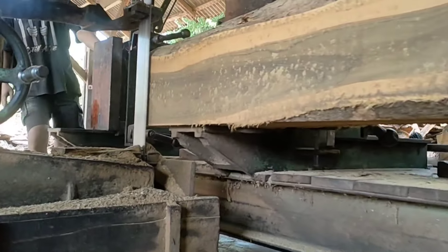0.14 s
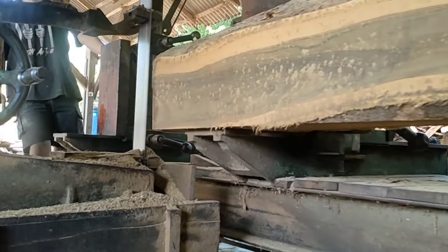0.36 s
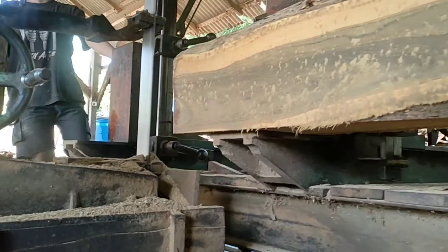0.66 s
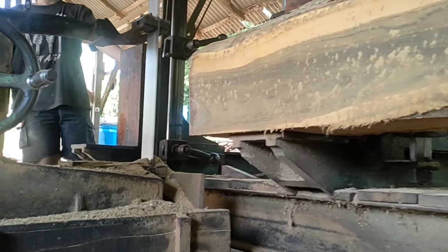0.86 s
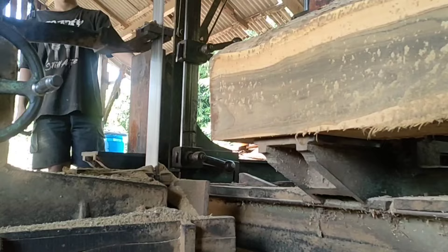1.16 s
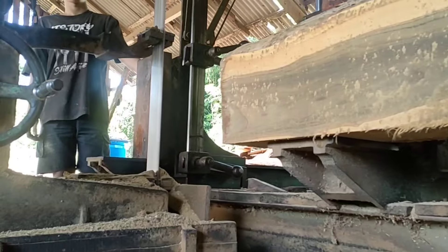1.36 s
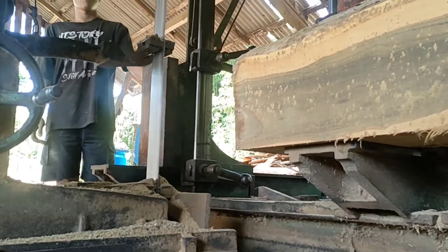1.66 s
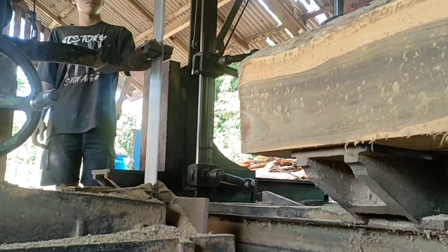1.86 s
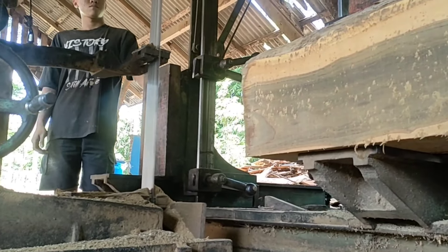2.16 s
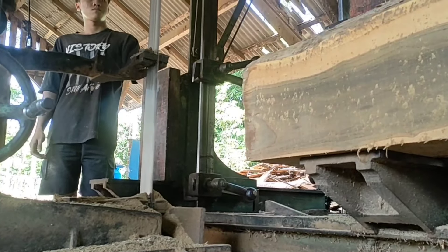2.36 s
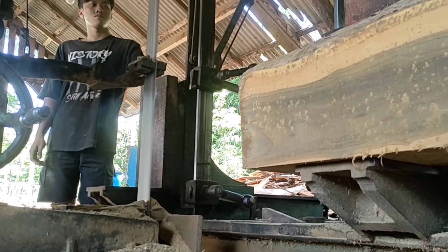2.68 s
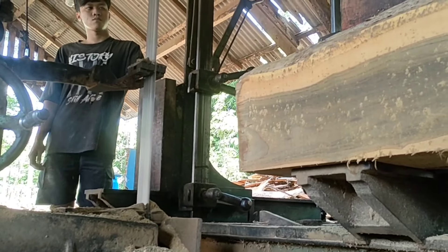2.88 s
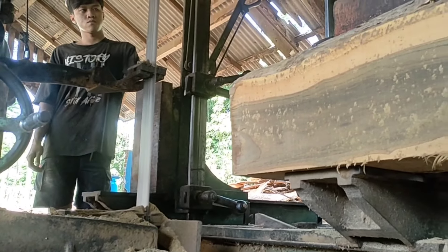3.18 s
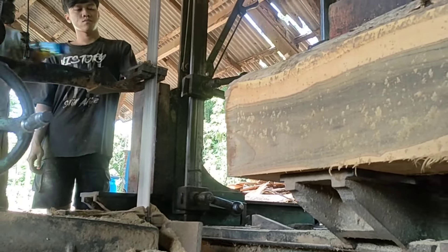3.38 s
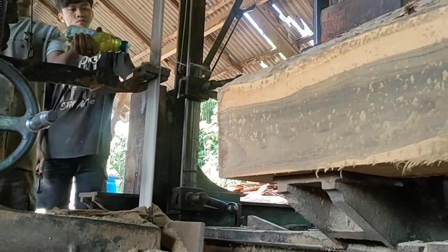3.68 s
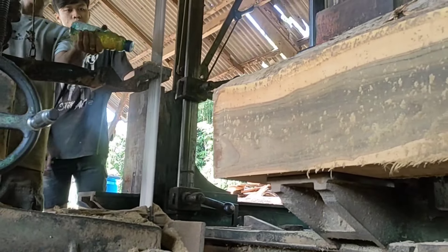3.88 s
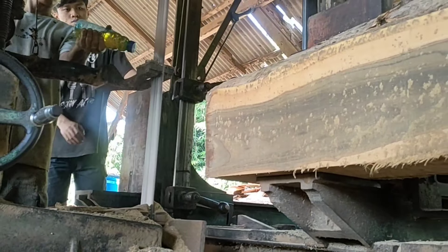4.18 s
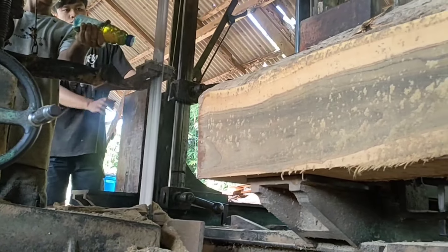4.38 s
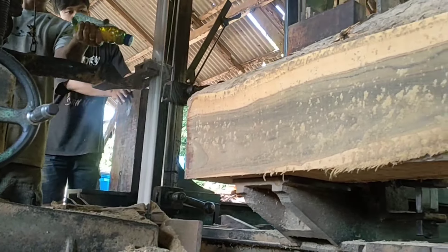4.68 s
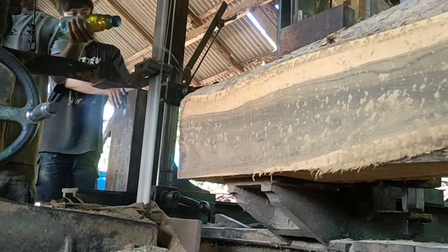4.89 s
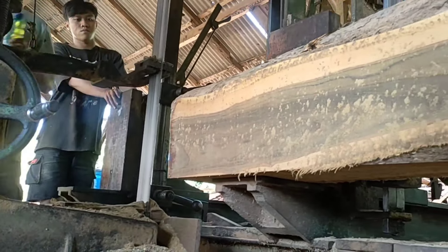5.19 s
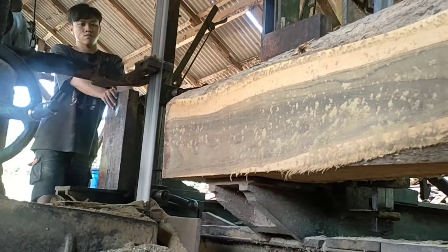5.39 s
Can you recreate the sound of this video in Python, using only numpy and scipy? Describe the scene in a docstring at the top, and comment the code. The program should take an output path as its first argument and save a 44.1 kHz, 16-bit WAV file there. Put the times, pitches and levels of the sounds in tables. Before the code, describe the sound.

A band sawmill idles loudly in an open shed, diesel engine clattering and roaring beneath a throbbing metallic blade hiss and thin whines.

```python
"""Idling band sawmill

A band sawmill runs idle in an open shed, driven by a four-cylinder diesel off to the left.
Shaped noise makes the roar, the blade hiss that throbs once a wheel turn, and a lumpy rumble below.
Every firing rings the engine block as clatter; sines make the engine orders, fan hum, whines and pipe note.
Grit ticks and stray knocks ring short modes; low bands are briefly turned down. Two spaced microphones hear it.
"""
import sys
import numpy as np
from scipy import signal
from scipy.io import wavfile
from scipy.ndimage import uniform_filter1d

SR = 44100
rng = np.random.default_rng(int(sys.argv[2]) if len(sys.argv) > 2 else 0)


def master(y):
    """Save y as 16-bit WAV."""
    cut = np.clip(np.atleast_2d(y).T, -1, 1)
    pcm = np.round(cut * 32767)  # scale
    wavfile.write(sys.argv[1], SR, pcm.astype(np.int16))


N = 244314

# Engine speed. Each row: time in seconds, engine cycles a second (four firings each).
ENGINE_SPEED = [(0, 10.165), (.9, 10.165), (1.2, 10.203), (3.9, 10.203), (4.2, 10.217), (5.6, 10.217)]
# Low and high engine orders. Each row: multiple of the engine cycle, level in dB rms before wavering.
ENGINE_ORDERS = [(4, -55), (8, -58), (12, -60), (18, -57), (29, -54), (31, -53), (50, -53), (62, -47)]
# Blade-pass tones of the fan. Each row: multiple, left and right level in dB rms before wavering.
FAN_TONES = [(1, -51, -52), (3, -50, -55), (4, -59, -46), (5, -49, -45), (6, -57, -47), (8, -52, -49)]
# Whines of shafts and belts, and steady lines near 1.9 kHz spaced by the firing rate. Each row: pitch in Hz,
# rms drift in Hz, left and right dB rms before wavering.
WHINES = [(310.4, 1, -49, -55), (431.3, 1, -51, -52), (689, 1, -62, -49), (876.8, 1, -52, -58),
          (935, 6, -47, -46), (1450.8, 1, -50, -56), (1491.8, 1, -49, -60), (1686.3, 2, -46, -50),
          (1849.4, 2, -42, -43), (1890, 2, -50, -45), (1972.3, 2, -43, -48)]
# Modes of the engine block. Each row: Hz, t60 in seconds, lag in seconds, drive in dB from cylinders 1 to 4.
BLOCK_MODES = [(1040, 0.014, 0.00234, -67, -53, -42, -52), (1667, 0.0092, 0.003046, -36, -41, -51, -21.5),
               (1777, 0.056, 0.000944, -48, -51, -31.5, -63),
               (1975, 0.052, 0.00089, -36.5, -43, -53.5, -32), (2270, 0.0098, 0.001155, -27, -47, -26, -26),
               (2540, 0.023, 0.00206, -31, -52, -33, -45)]
# Strength of the clatter. Each row: time in seconds, gain in dB.
CLATTER_GAIN = [(0, -8), (.4, 0.5), (.65, -1), (1, -2.5), (1.5, -4.5), (2.8, -0.5), (3.5, -4.5), (4.3, -1),
                (5, -1), (5.6, -1.5)]
# Colour of the roar. Each row: Hz, relative density in dB per Hz.
ROAR_COLOUR = [(60, -48), (100, -14), (140, -10), (263, -5), (372, -2.5), (584, -4), (746, -2), (900, -5),
               (1270, -1), (1950, -4), (2820, -4), (4000, -3.5), (5200, -46), (8800, -80)]
# Resonances of frame and housing. Each row: centre in Hz, width in Hz, lift in dB.
ROAR_PEAKS = [(253.6, 22, 7), (437, 63, -1), (572, 17, 3.5), (641, 7.2, 9.5), (640.7, 8.9, 7.5),
              (668, 7, 6.5), (725, 39, -5.5), (915, 29, -5), (944, 46, 9.5), (1010.6, 23, 9.5),
              (1110, 340, 0), (1274, 44, -18), (1346, 42, 2.5), (1405, 53, 1.5), (1590, 43, 3.5),
              (1770, 30, 4.5), (1680, 40, -2.5), (1930, 160, 3.5), (2014, 85, 7), (2040, 30, 2.5),
              (2220, 52, 1), (2230, 25, 6.5), (2260, 23, 0.5), (2400, 50, 4), (2540, 37, -1),
              (2650, 31, 7.5)]
# Stereo likeness of roar and rumble. Each row: Hz, left-right likeness from 0 to 1.
ROAR_SAME = [(60, .99), (180, .975), (280, .94), (500, .45), (1000, .35), (2000, .35), (4000, .25)]
# Stereo lead of roar and tones. Each row: Hz, radians by which the left microphone leads.
ROAR_LEAD = [(100, 0), (340, .3), (600, 1), (1030, 2.1), (1400, 3.3), (1980, 5.8), (3100, 8.9), (4000, 9.4)]
# Once-a-turn surge in the middle of the roar. Each row: time in seconds, depth in dB (negative inverts it).
SURGE_DEPTH = [(0, 1), (.15, .5), (.28, 3), (.38, 5.5), (.48, 6.5), (.58, 1.5), (.68, 3), (.79, 4.5),
               (.9, -1), (1.1, -0.5), (1.6, -2.5), (2.5, -0.5), (3.2, -2.5), (4.2, 0.5), (4.8, -2.5),
               (5.54, 1)]
# The part of the roar that surges: lower and upper edge in Hz.
SURGE_BAND_HZ = [1400, 2450]
# Colour of the blade hiss. Each row: Hz, relative density in dB per Hz.
HISS_COLOUR = [(300, -88), (1200, -8.5), (2200, -6.5), (3000, -5.5), (4300, -2.5), (4800, -4), (5300, -7),
               (5800, -8.5), (6200, -11), (7400, -21), (8200, -19.5), (10000, -22), (11800, -26),
               (13500, -29), (15500, -31)]
# Resonances of blade and guides. Each row: centre in Hz, width in Hz, lift in dB.
HISS_PEAKS = [(2800, 120, -2), (2990, 90, 2.5), (3120, 60, -3.5), (3420, 100, -2), (3760, 400, 5),
              (3880, 40, 2.5), (3950, 90, -3), (4090, 120, 1.5), (4210, 90, -3), (4361, 50, 2.5),
              (4330, 220, 2.5), (4550, 100, -1.5), (4700, 90, 1), (4810, 80, -5.5), (4950, 140, 2.5),
              (5180, 60, 3.5), (5255, 50, -4.5), (5420, 250, 2), (5610, 150, 4), (5790, 60, 3.5),
              (6010, 100, -3.5), (6090, 70, 2), (6400, 250, 3.5), (6740, 150, -5), (6970, 210, 9.5),
              (7710, 240, 6.5), (8500, 500, 2.5), (10900, 260, 4), (13500, 600, 5)]
# Stereo balance of the hiss. Each row: Hz, left minus right in dB.
HISS_LEFT = [(1400, -1.5), (2200, 2.5), (4200, 1.5), (4800, 0.5), (8100, 0.5), (8500, 4.5), (9800, 6),
             (11000, -3), (12000, 1.5)]
# Stereo likeness of the hiss. Each row: Hz, left-right likeness from 0 to 1.
HISS_SAME = [(3000, 0.3), (6000, 0.4), (9000, 0.3), (13000, 0.55)]
# Once-a-turn swell of the hiss. Each row: Hz, depth in dB at full press.
THROB_DEPTH = [(2000, 6.5), (4000, 1), (7000, 2.5), (12000, 2)]
# Level of the blade hiss. Each row: time in seconds, gain in dB.
BLADE_GAIN = [(0, -24), (.5, -23), (1.5, -22.5), (2.2, -23), (2.8, -21.5), (3.3, -23), (3.9, -22.5),
              (4.6, -23), (5.54, -23.5)]
# Brief dips of one low band. Each row: middle and length in seconds, depth in dB, lower and upper edge in Hz.
LOW_BAND_DIPS = [(.45, .09, -10, 15, 70), (.81, .04, -8, 90, 200), (.94, .04, -14, 15, 100),
                 (1.15, .09, -12, 15, 100), (1.27, .06, -12, 15, 90), (1.49, .06, -16, 15, 130),
                 (1.55, .16, -9, 85, 135), (1.63, .08, -18, 10, 230), (2.02, .13, -24, 8, 140),
                 (2.24, .1, -22, 8, 120), (2.3, .08, -14, 65, 180), (2.4, .05, -12, 15, 100),
                 (3.17, .14, -14, 70, 200), (3.33, .045, -18, 15, 110), (3.7, .12, -15, 115, 205),
                 (4.46, .04, -12, 15, 100), (4.9, .14, -8, 80, 140), (5, .05, -16, 15, 100),
                 (5.12, .05, -12, 15, 90)]
# Stray knocks on the frame. Each row: start in seconds, strength of the scrape in dB.
KNOCKS = [(0.469, -23.5), (4.65, -18)]
# Modes rung by a knock. Each row: Hz, level in dB, t60 in seconds.
KNOCK_MODES = [(2030, -12, .04), (2440, -2, 0.038), (2920, 3, 0.034)]
# Colour of the grit ticks. Each row: ring in Hz, relative level in dB.
GRIT_COLOUR = [(1500, -10), (2500, -2.5), (4000, -2), (6000, -16.5), (9000, -24), (14000, -21)]

ROAR_DB, RUMBLE_DB = -22.5, -48.5
WHEEL_HZ, WHEEL_TURN = 9.617, .32  # turns a second, share of a turn at the start
PIPE_HZ, PIPE_DB = 266, -40.5  # centre of the exhaust note; level before wavering and puffs
LUMP_DB, LUMPS_HZ, LUMP_TOP = 6, 14, .3  # dB per unit of chance, pace, chance above which a lump holds
LUMPY_ORDERS = 2  # how many of the first engine orders come and go with the lumps
FAN_GEAR = 16.375  # blade passes per engine cycle
SING_HZ, SING_DB = 1023.8, -38  # a clean whine that steps up and stays; full level before wavering
SING_S, SING_RISE_S, SING_EARLY = 1.6, .38, .54  # zero and length of its ramp in s, lowest share of full level
GRIT_PER_S, GRIT_SPREAD_DB = 900, 4  # average ticks a second, mean of the size draw before its cap
GRIT_DB, GRIT_T60_S = -38.5, .012  # level before the shed, ring time
EDGE_HZ = 15480  # upper edge of the whole sound


def amp(db):
    """Turn dB into a linear gain."""
    return 10 ** (np.asarray(db) / 20)


def evened(x):
    """Scale to an rms of 1."""
    return x / np.sqrt(np.mean(x ** 2) + 1e-20)


def read(points, hz):
    """Read a table by frequency on a logarithmic axis."""
    f, value = np.transpose(points)
    return np.interp(np.log(hz + 1), np.log(f + 1), value)


def curve(rows, t):
    """Read a table by time, in straight lines between its rows."""
    return np.interp(t, *np.transpose(rows))


def humps(peaks, hz):
    """Shape resonances as bell-shaped lifts or dips in dB."""
    return sum(db / (1 + (2 * (hz - f) / width) ** 2) for f, width, db in peaks)


def wander(rate_hz):
    """Slow random drift of rms 1: white noise through a one-pole low-pass at 100 steps a second."""
    steps = rng.standard_normal(N * 100 // SR + 102)
    slow = signal.lfilter([1], [1, -np.exp(-2 * np.pi * rate_hz / 100)], steps)
    settled = evened(slow[100:])
    return np.interp(np.arange(N) / SR, np.arange(len(settled)) / 100, settled)


def wheel_swing(t):
    """Cosine that peaks once each wheel turn."""
    return np.cos(2 * np.pi * (WHEEL_HZ * t + WHEEL_TURN))


def noise(field_db, same, lead, size, patchy_db, left_db=0):
    """Stereo noise from random short-time spectra; the shared part leads on the left by lead(hz) radians."""
    hop = size // 4
    hz = np.fft.rfftfreq(size, 1 / SR)[:, None]
    t = np.arange(N // hop + 5) * hop / SR
    a, b, c, d, patches = rng.standard_normal((len(t), len(hz), 5)).T
    patches = uniform_filter1d(patches, size=3, axis=0)  # over frequency
    patches = evened(uniform_filter1d(patches, size=8, axis=1))  # over time
    likeness = np.clip(same(hz), 0, 1)
    left = a + 1j * b
    shared = likeness * left * np.exp(-1j * lead(hz))
    right = shared + np.sqrt(1 - likeness ** 2) * (c + 1j * d)
    tilt = amp(left_db(hz) / 2) if left_db else 1
    spectra = np.array([left * tilt, right / tilt]) * amp(field_db(hz, t) + patchy_db * patches)
    return evened(signal.istft(spectra, nperseg=size, noverlap=size - hop)[1][:, :N])


def roar():
    """Exhaust, belts and fan wash as noise coloured by the frame; its middle surges with the wheel."""
    def field_db(hz, t):
        return read(ROAR_COLOUR, hz) + humps(ROAR_PEAKS, hz)

    wash = amp(ROAR_DB) * noise(field_db, lambda hz: read(ROAR_SAME, hz), lambda hz: read(ROAR_LEAD, hz),
                                size=4096, patchy_db=1.44)
    t = np.arange(N) / SR
    middle_filter = signal.butter(2, SURGE_BAND_HZ, "band", fs=SR, output="sos")
    middle = signal.sosfiltfilt(middle_filter, wash)
    surge = amp(curve(SURGE_DEPTH, t) * wheel_swing(t))
    return wash + middle * (surge - 1)


def blade():
    """Teeth in the air and steel on the guides as hiss; the band presses harder once each wheel turn."""
    def field_db(hz, t):
        drift = evened(uniform_filter1d(rng.standard_normal(t.size), size=60))
        press = np.clip(0.7 + 0.3 * drift, 0, 1.1)
        flicker = uniform_filter1d(rng.standard_normal(t.size), size=3)
        throb = read(THROB_DEPTH, hz) * (wheel_swing(t) * press + 0.34 * flicker)
        return read(HISS_COLOUR, hz) + humps(HISS_PEAKS, hz) + throb

    hiss = noise(field_db, lambda hz: read(HISS_SAME, hz),
                 lambda hz: 2 * np.pi * hz * .00009,  # the left leads by 0.09 ms
                 size=1024, patchy_db=3.5, left_db=lambda hz: read(HISS_LEFT, hz))
    return amp(curve(BLADE_GAIN, np.arange(N) / SR)) * hiss


def clatter(cycles, rough=.45):
    """Each combustion is a tick and a rasp of noise that ring the block's modes; cylinders differ."""
    t = np.arange(N) / SR
    firing = np.floor(4 * cycles).astype(int)
    tick = np.diff(firing, prepend=-1) > 0
    strength = amp(0.67 * rng.standard_normal(firing[-1] + 1))[firing] * amp(curve(CLATTER_GAIN, t))
    since = (4 * cycles) % 1 / .08  # the rasp peaks 8 % of the way to the next firing
    rasp = since * np.exp(1 - since) / 10
    out = np.zeros(N)
    ring_t = np.arange(4000) / SR
    for hz, t60, lag, *cylinder_db in BLOCK_MODES:
        drive = (1 - rough) * tick + rough * rasp * rng.standard_normal(N)
        drive *= strength * amp(cylinder_db)[firing % 4]
        u = np.maximum(ring_t - lag, 0)
        ring = 6 * amp(-60 * u / t60) * np.sin(2 * np.pi * hz * u)
        out += signal.oaconvolve(drive, ring)[:N]
    out = signal.sosfilt(signal.butter(4, 600, "high", fs=SR, output="sos"), out)
    left = out * amp(-1.0)
    right = np.pad(out, (21, 0))[:N] * amp(-7.0)  # 21 samples later
    return shed(np.array([left, right]))


def tones(cycles, lumps):
    """Engine orders, the fan's stack and the whines as sines, each wavering a little in level."""
    t = np.arange(N) / SR
    start_hz = ENGINE_SPEED[0][1]

    def lag(hz):
        """Turns by which each side trails: none on the left."""
        return read(ROAR_LEAD, hz) / (2 * np.pi) * np.array([[0], [1]])

    def sine(turns):
        return np.sqrt(2) * np.sin(2 * np.pi * (turns + rng.random())) * amp(2.2 * wander(3.8))

    out = np.zeros((2, N))
    for k, (order, db) in enumerate(ENGINE_ORDERS):
        gain = lumps if k < LUMPY_ORDERS else 1
        out += amp(db) * sine(order * cycles - lag(order * start_hz)) * gain
    fan = FAN_GEAR * cycles + 0.02 * wander(0.58)
    for order, left_db, right_db in FAN_TONES:
        out += amp([[left_db], [right_db]]) * sine(order * fan - lag(order * FAN_GEAR * start_hz))
    for hz, width, left_db, right_db in WHINES:
        turns = np.cumsum(hz + width * wander(3.03)) / SR
        out += amp([[left_db], [right_db]]) * sine(turns - lag(hz))
    step_up = np.clip((t - SING_S) / SING_RISE_S, SING_EARLY, 1)
    return out + amp(SING_DB) * step_up * sine(SING_HZ * t - lag(SING_HZ))


def exhaust(cycles):
    """The pipe sings a note unsteady in pitch and level that every firing pumps up anew."""
    turns = np.cumsum(PIPE_HZ + 5.5 * wander(7.0)) / SR
    note = np.sqrt(2) * np.sin(2 * np.pi * turns) * amp(2.2 * wander(9.0))
    puffs = 1 + 0.45 * np.cos(2 * np.pi * (4 * cycles - .65))
    return amp(PIPE_DB) * note * puffs


def grit(count=40):
    """Sparse ticks, each ringing one patch of the blade for a moment; denser once a wheel turn."""
    t, ring_t = np.arange(N) / SR, np.arange(1500) / SR
    pace = GRIT_PER_S * (1 + 0.49 * wheel_swing(t))
    size = amp(GRIT_SPREAD_DB * np.minimum(rng.exponential(1, N), 4))
    hits = size * (rng.random(N) < pace / SR) * rng.choice([-1, 1], N)
    patch = rng.integers(0, count, N)
    pitches = np.geomspace(GRIT_COLOUR[0][0], GRIT_COLOUR[-1][0], count) * rng.uniform(.97, 1.03, count)
    out = np.zeros((2, N))
    for k, hz in enumerate(pitches):
        ring = amp(read(GRIT_COLOUR, hz) - 60 * ring_t / GRIT_T60_S) * np.sin(2 * np.pi * hz * ring_t)
        side = rng.uniform(0, np.pi / 2)  # each patch has its own place in the stereo picture
        pan = np.array([[np.cos(side)], [np.sin(side)]])
        out += pan * signal.oaconvolve(hits * (patch == k), ring)[:N]
    return shed(amp(GRIT_DB) * evened(out))


def knocks():
    """A 200-sample scrape of noise rings a few quick modes of the frame."""
    drive, t = np.zeros(N), np.arange(2000) / SR
    scrapes = rng.standard_normal((len(KNOCKS), 200))
    for (s, db), scrape in zip(KNOCKS, scrapes):
        drive[round(s * SR):][:200] += amp(db) * scrape / np.sqrt(200)
    ring = sum(amp(db - 60 * t / t60) * np.sin(2 * np.pi * hz * t) for hz, db, t60 in KNOCK_MODES)
    return shed(signal.oaconvolve(drive, ring)[:N] * np.ones((2, 1)))


def rumble(lumps):
    """The lowest sound is a hump of noise that comes in lumps, nearly alike on both sides."""
    def field_db(hz, t):
        fall_above = -30 * np.log10(1 + (hz / 80) ** 2)
        fall_below = -30 * np.log10(1 + (30 / (hz + 1)) ** 2)
        return fall_above + fall_below

    body = noise(field_db, lambda hz: read(ROAR_SAME, hz), lambda hz: 0 * hz, size=4096, patchy_db=0.0)
    return amp(RUMBLE_DB) * lumps * body


def lumping():
    """Random gain of rms 1 that holds for a while and now and then drops away."""
    chance = evened(uniform_filter1d(wander(LUMPS_HZ), size=1200))
    return evened(amp(LUMP_DB * np.minimum(chance, LUMP_TOP)))


def dipped(x):
    """Each dip turns one low band down for a moment with a flat-bottomed gain curve."""
    t, out = np.arange(N) / SR, x.copy()
    for s, length, db, low_hz, high_hz in LOW_BAND_DIPS:
        middle = round(s * SR)
        near = slice(max(middle - SR // 3, 0), middle + SR // 3)
        band_filter = signal.butter(3, [low_hz, high_hz], "band", fs=SR, output="sos")
        band = signal.sosfiltfilt(band_filter, out[:, near])
        dip = amp(db * np.exp(-(2 * (t[near] - s) / length) ** 4))
        out[:, near] += band * (dip - 1)
    return out


def shed(x, t60=.07, wet_db=-7):
    """Dense echoes of random sign from the roof and the machines, different on each side."""
    t = np.arange(SR // 4) / SR
    signs = rng.choice([-1., 1.], (2, len(t)))
    echoes = rng.random((2, len(t))) < .05
    tail = signs * echoes * amp(-60 * t / t60) * (t > .003)
    tail *= amp(wet_db) / np.linalg.norm(tail, axis=1, keepdims=True)
    return x + signal.oaconvolve(x, tail, axes=1)[:, :N]


def scene():
    """Mix engine, blade and background on one engine clock, then turn low bands down in the dips."""
    cycles = np.cumsum(curve(ENGINE_SPEED, np.arange(N) / SR)) / SR + .036
    lumps = lumping()
    mix = roar() + blade() + clatter(cycles) + tones(cycles, lumps) + exhaust(cycles)
    mix = mix + grit() + knocks() + rumble(lumps)
    return dipped(mix)


def record(dry):
    """Steep low-pass that closes the top of the band at EDGE_HZ."""
    low_pass = signal.firwin(2047, EDGE_HZ, window=("kaiser", 10), fs=SR)
    return signal.oaconvolve(dry, low_pass[None], "same")


dry = scene()
out = record(dry)
master(out)
```